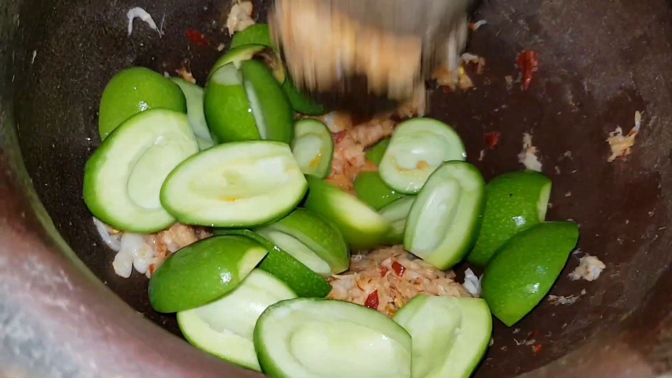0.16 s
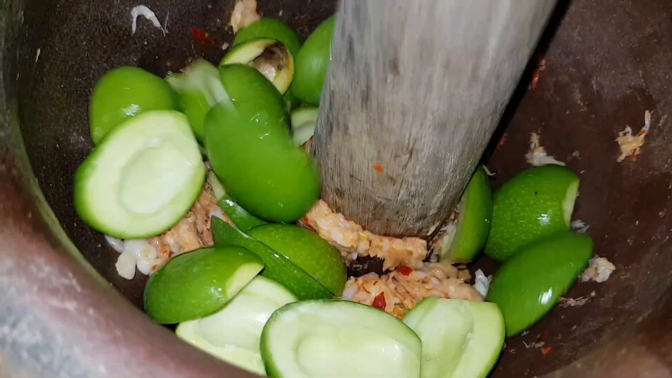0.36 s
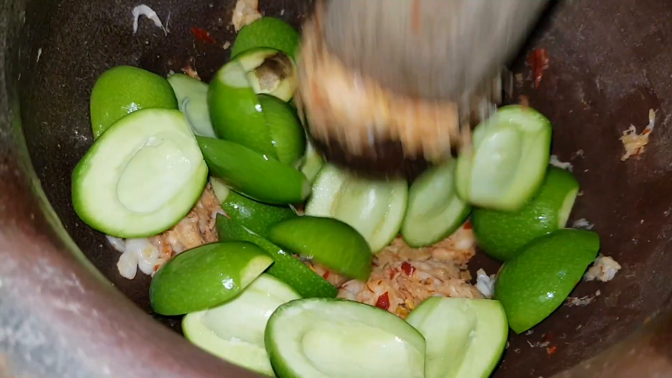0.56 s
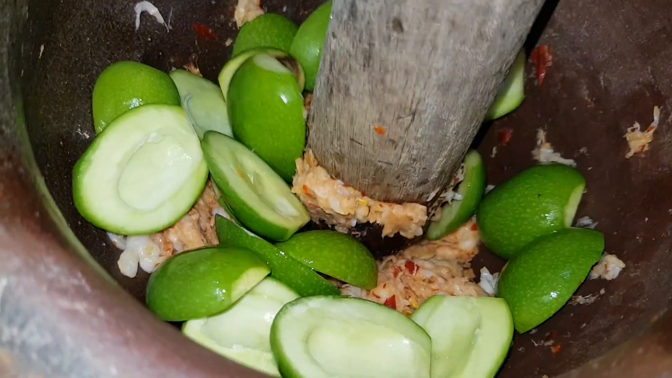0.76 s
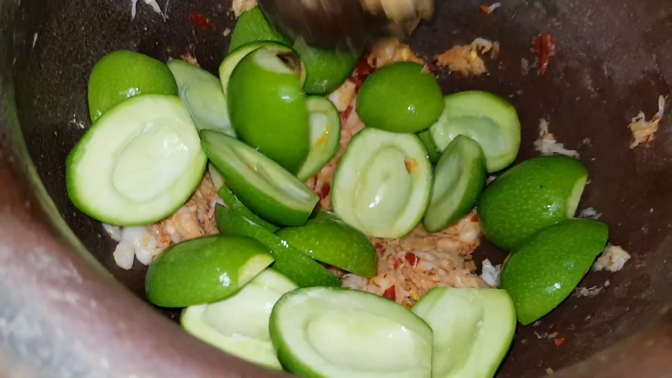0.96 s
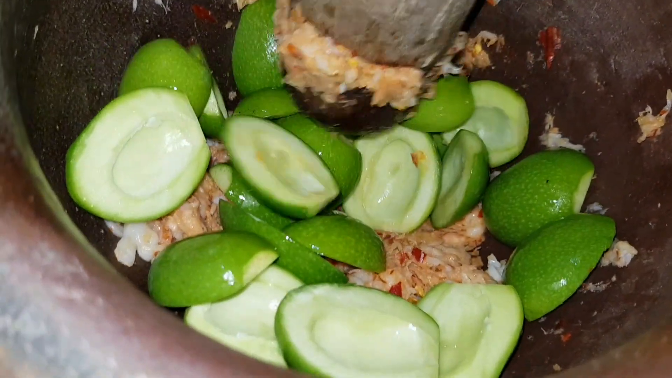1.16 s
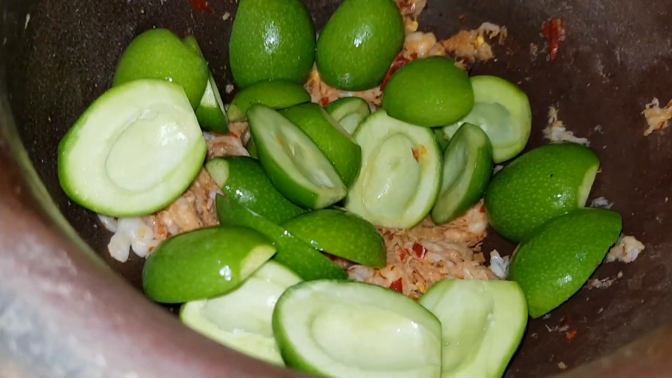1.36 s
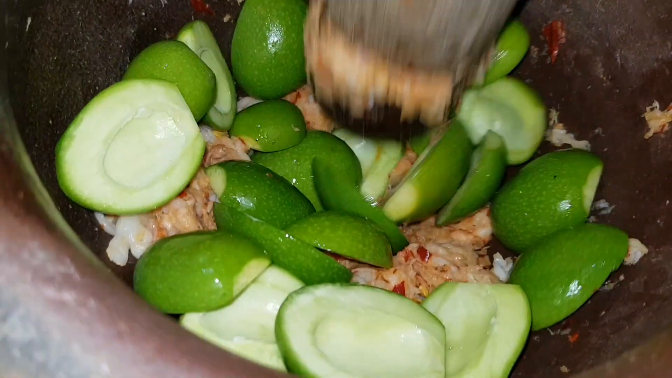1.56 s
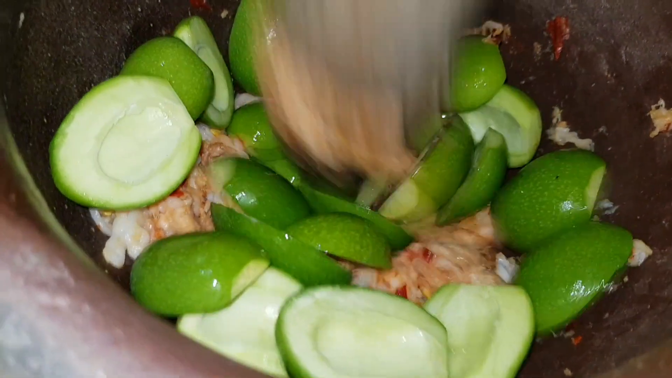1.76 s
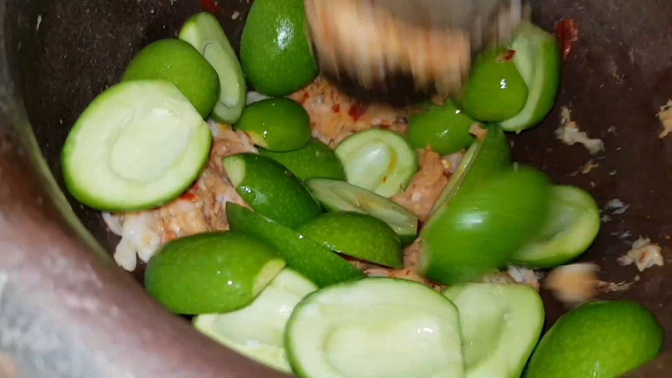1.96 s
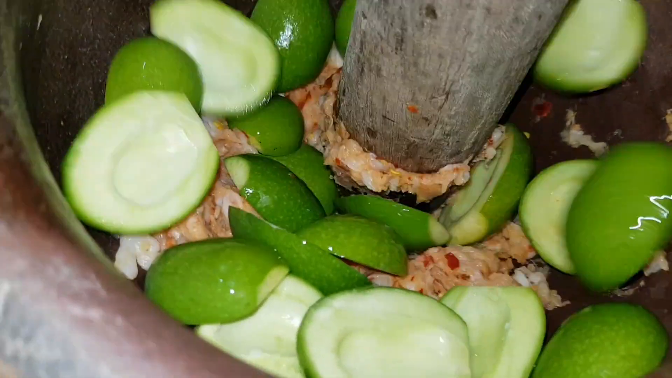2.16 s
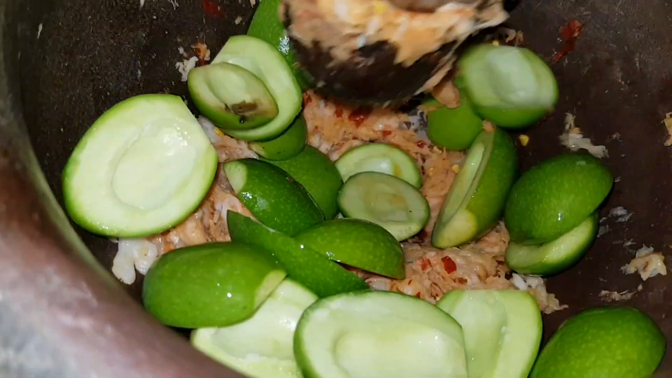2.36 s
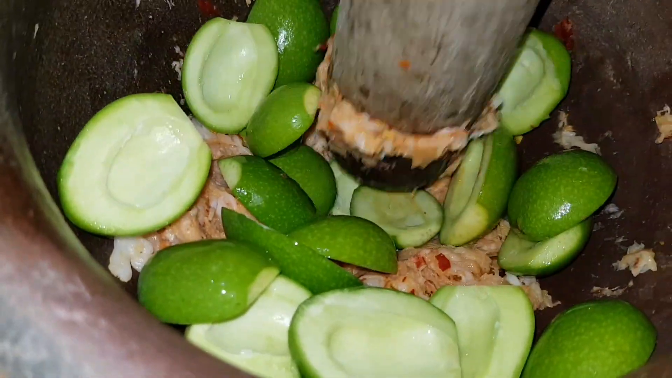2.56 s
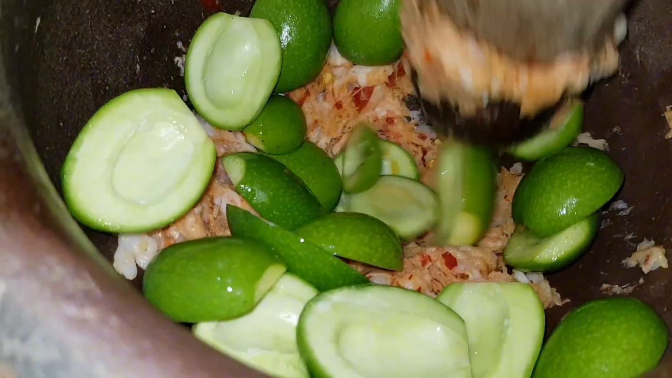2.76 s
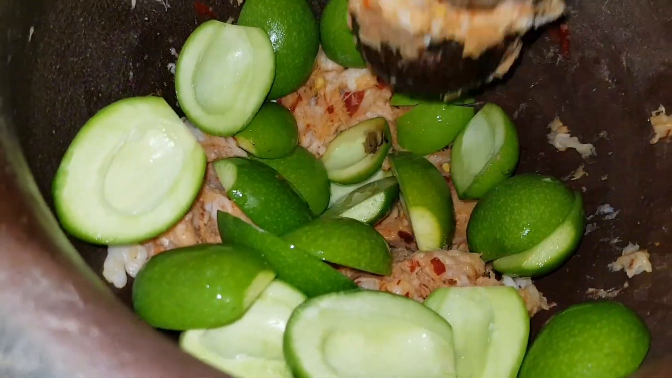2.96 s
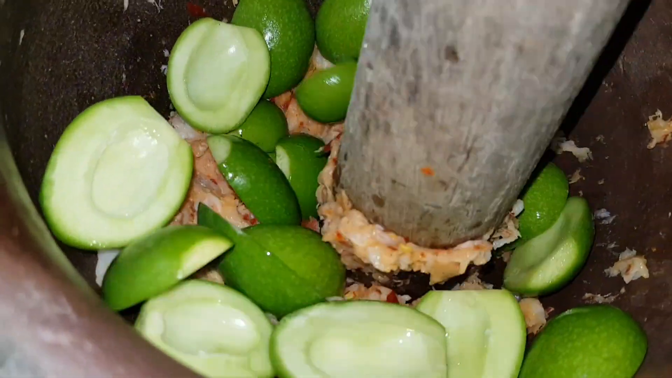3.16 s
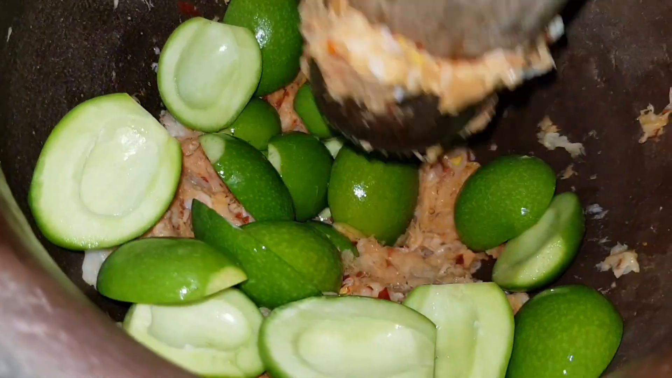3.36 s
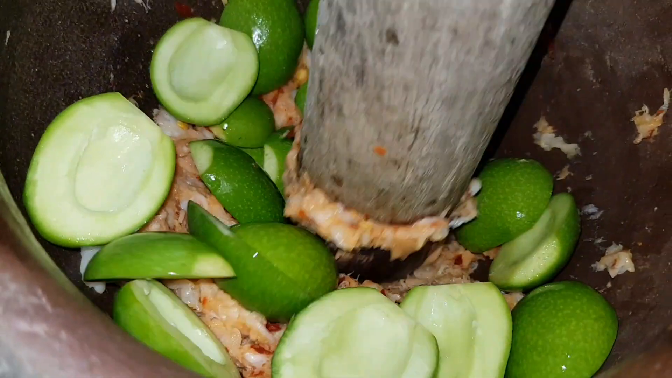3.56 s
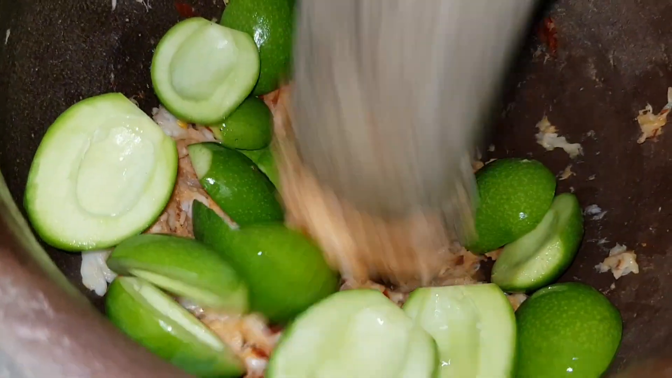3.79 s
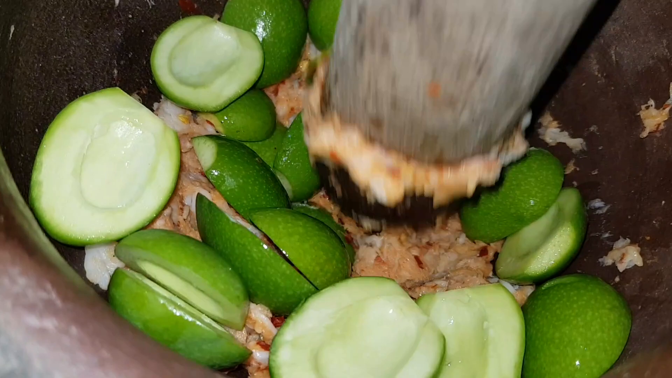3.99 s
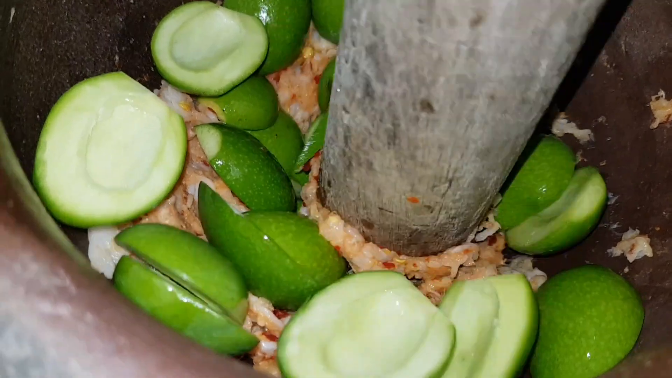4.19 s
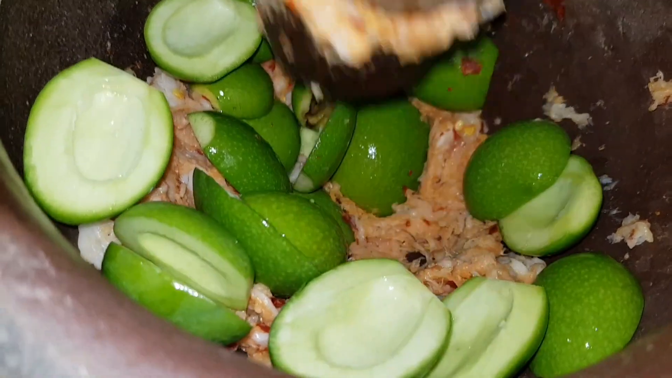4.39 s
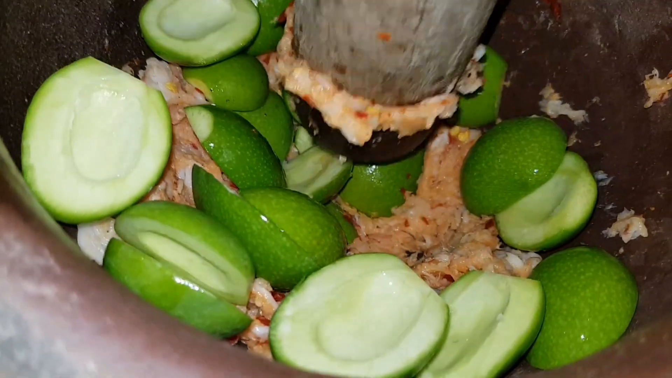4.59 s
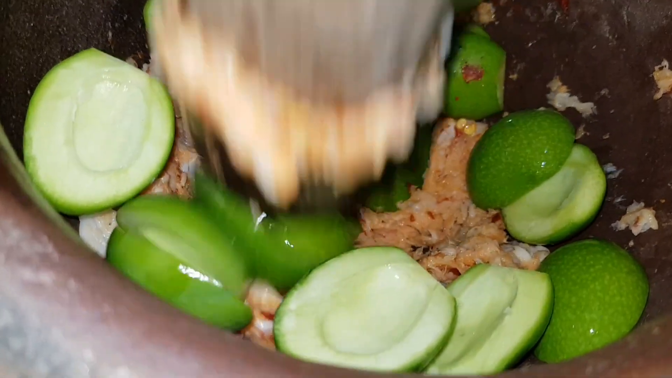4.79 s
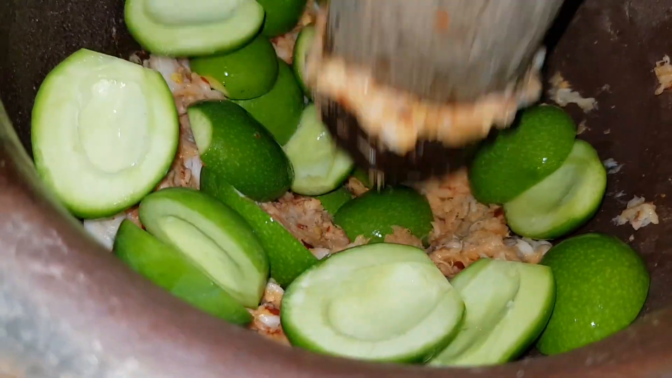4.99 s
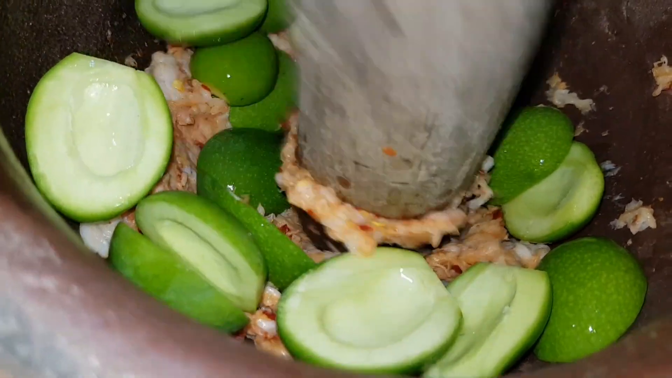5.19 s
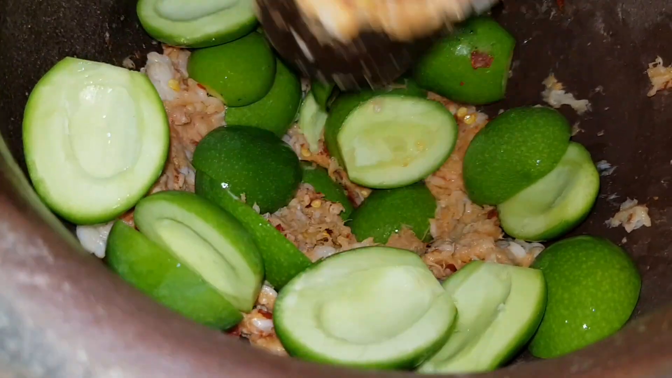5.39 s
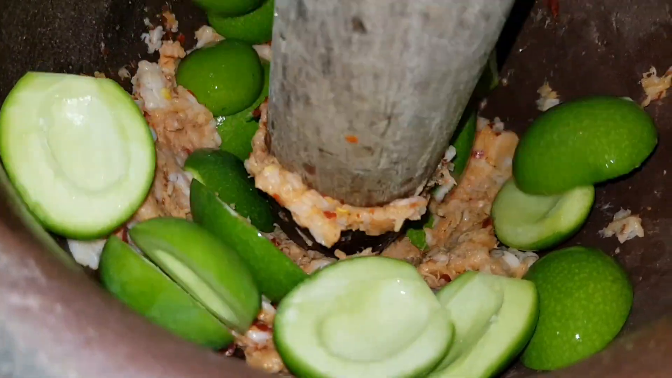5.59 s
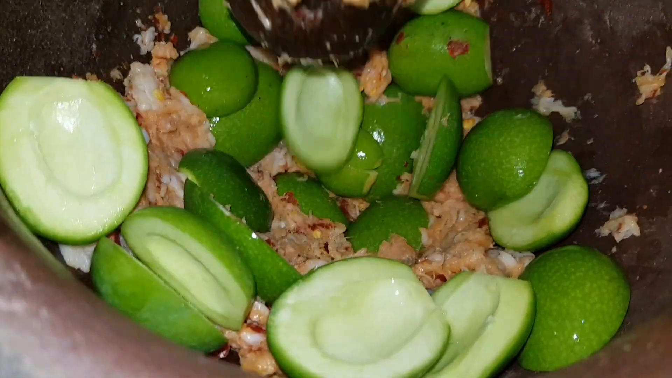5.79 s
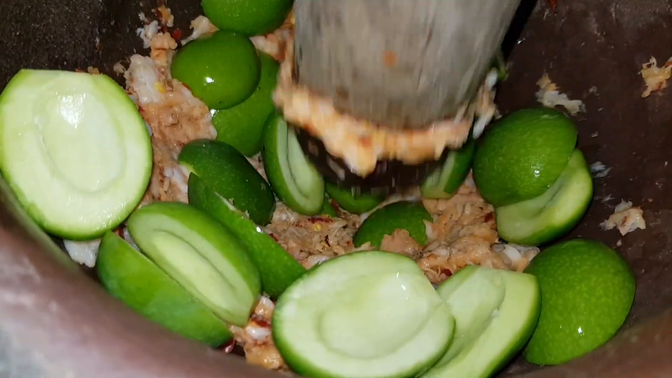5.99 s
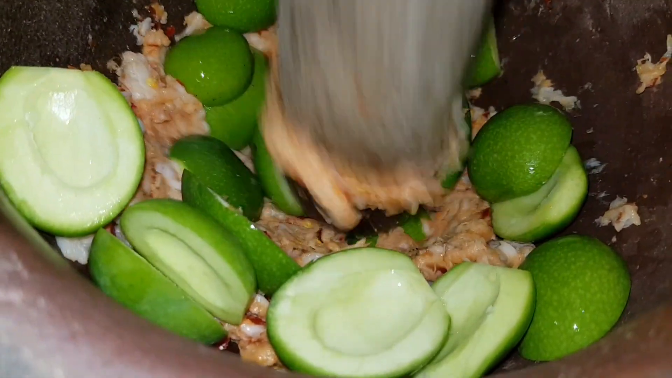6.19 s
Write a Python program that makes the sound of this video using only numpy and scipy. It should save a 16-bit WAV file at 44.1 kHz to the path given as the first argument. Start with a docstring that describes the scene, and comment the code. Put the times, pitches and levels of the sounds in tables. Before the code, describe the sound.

A quiet room, microphone close to a clay mortar. From 0.04 s to the end at about 6 s a wooden pestle strikes every 0.35 s, eighteen strokes in all. Each gives a short, damped, hollow knock, a wet crackling crunch with fine juice fizz, and a soft low thump through the floor. Strokes at 0.4 to 1.5 s are mostly muted; a crisp, crunchy one lands near 2.2 s, a hard knock at 2.5 s, and firm blows around 3.5 to 4.6 s and 5.9 s. Slices tumble softly at 2.3 to 2.8 s. Sticky squelches follow the lifts, clearer after 2.8 s. The base rocks with dull bouncing knocks from 2.25 s, frequent after 2.9 s, loudest at 5.36 s. A tiny juice hiss spits at 3.3 s. Faint raspy cricket chirps near 4.5 kHz run almost continuously over low, soft room noise.

```python
"""Quiet room: a wooden pestle pounds sliced green fruit into shrimp paste in a clay mortar, close by.
About three strokes a second: noise grains crunch and fizz as flesh tears, damped modes knock in the bowl,
low modes thump in the floor. Between strokes the mortar rocks on its base with dull, bouncing knocks.
Paste squelches as the pestle lifts, slices tumble and slide; shaped noise bursts and soft knocks.
Outside a cricket chirps in gliding, raspy tones; filtered noise and faint far tones fill the room."""
import sys
import numpy as np
from scipy import signal
from scipy.fft import rfft, irfft
from scipy.io import wavfile
from scipy.ndimage import uniform_filter1d

SR = 44100
rng = np.random.default_rng(int(sys.argv[2]) if len(sys.argv) > 2 else 0)


def wrap_up_sound(samples):
    """Save the sound to the file named by the first command line argument, as 16-bit audio."""
    columns = np.atleast_2d(samples).T
    # keep every value between -1 and 1, then stretch to whole-number steps
    tamed = np.clip(columns, -1, 1)
    steps = np.round(tamed * 32767).astype(np.int16)
    wavfile.write(sys.argv[1], SR, steps)


N = 275448

# Pestle squeezing fruit, then pulling out of the paste. Each row: start in seconds, length in seconds,
# then relative levels in dB of crunch, juice spray, floor thump, suck on lifting.
STROKES = [(0.038, 0.023, -25.5, -34, -34, -80), (0.405, 0.034, -38, -39.5, -44, -51.5),
           (0.757, .038, -32.5, -41, -36, -75), (1.107, 0.055, -42.5, -40.5, -43, -67),
           (1.481, 0.034, -32, -39.5, -33, -75), (1.83, 0.02, -24.5, -33, -26.5, -77),
           (2.161, 0.021, -20, -34.5, -22.5, -58.5), (2.493, .023, -32, -35.5, -27, -55),
           (2.821, 0.065, -40, -42, -39, -53), (3.172, 0.036, -28.5, -38, -43, -47),
           (3.528, 0.02, -31.5, -36, -26.5, -54), (3.863, 0.022, -28, -39.5, -25.5, -48),
           (4.198, 0.0394, -31.5, -39.5, -21, -42), (4.542, 0.03, -33.5, -40, -28, -77),
           (4.873, 0.057, -37, -42, -39.5, -52), (5.228, 0.054, -37, -40, -31, -48.5),
           (5.575, 0.044, -30.5, -41.5, -29, -49.5), (5.917, 0.018, -24, -35.5, -23.5, -77)]
# Ring of the mortar struck from inside, led by the air in its hollow.
# Each row: frequency in Hz, relative level in dB, t60 in seconds.
BOWL_MODES = [(445, -23.5, 0.11), (623.2, 3, 0.046), (762, 6.5, 0.013), (980, -5.5, 0.02),
              (1035, -5, 0.022), (1253, -13.5, 0.071), (1655, -7.5, 0.039), (2210, -11.5, 0.031),
              (2530, -52, 0.173), (2863, -7, 0.044), (3040, -27.5, 0.027)]


def undb(db):
    """Decibels to amplitude gain."""
    return 10 ** (np.asarray(db) / 20)


def unit(x):
    """Scale to rms 1."""
    return x / np.sqrt(np.mean(x ** 2) + 1e-18)


def clock(length_s):
    """Sample times in seconds."""
    return np.arange(int(length_s * SR)) / SR


def fade(t, t60_s):
    """Exponential decay, 60 dB in t60."""
    return np.exp(-np.log(1000) * t / t60_s)


def add(track, at_s, sound):
    """Mix a sound into a track at a time, cropped to the track."""
    i = int(round(at_s * SR))
    a, b = max(i, 0), min(i + len(sound), N)
    if b > a:
        track[a:b] += sound[a - i:b - i]


def through(x, response):
    """Convolve with an impulse response, keeping the length of x."""
    return signal.oaconvolve(x, response)[:len(x)]


def butter(order, hz, kind, x):
    """Butterworth filter."""
    return signal.sosfilt(signal.butter(order, hz, kind, fs=SR, output="sos"), x)


def colour(points, size=4096):
    """Minimum-phase response of unit energy with a given spectrum, via the folded cepstrum."""
    hz, db = np.transpose(points)
    bins_hz = np.maximum(np.fft.rfftfreq(size, 1 / SR), 1)
    level_db = np.interp(np.log(bins_hz), np.log(hz), db)
    cepstrum = irfft(np.log(undb(level_db)))
    cepstrum[1:size // 2] *= 2
    cepstrum[size // 2 + 1:] = 0
    response = irfft(np.exp(rfft(cepstrum)))
    return response / np.linalg.norm(response)


def ring(modes, detune=0, length_s=.15):
    """Sum of damped modes, each shifted at random by a fraction of its pitch (load in the bowl)."""
    t = clock(length_s)
    out = 0
    for hz, db, t60_s in modes:
        shifted_hz = hz * (1 + detune * rng.standard_normal())
        out = out + undb(db) * fade(t, t60_s) * np.cos(2 * np.pi * shifted_hz * t)
    return out


def knock(modes, contact_ms, detune):
    """A smooth push rings the modes: the longer the contact, the duller the knock. Peak 1."""
    t = clock(.008)
    contact_s = max(contact_ms, .2) / 1000
    push = np.sin(np.pi * np.minimum(t / contact_s, 1)) ** 2
    sound = through(ring(modes, detune, length_s=.08), push)
    return sound / np.abs(sound).max()


def walk(rate_hz):
    """Smoothed random steps, rms 1."""
    k = int(SR / rate_hz)
    steps = np.repeat(rng.standard_normal(N // k + 1), k)
    return unit(uniform_filter1d(uniform_filter1d(steps, k), k)[:N])


def grains(per_s, spread_db):
    """Bursting cells: random clicks of uneven size, rms 1."""
    size = undb(spread_db * np.minimum(rng.exponential(size=N), 4))
    return unit((rng.random(N) < per_s / SR) * size * rng.standard_normal(N))


def spurts(per_s=300, depth_db=3.5):
    """Flesh gives way in fits and starts: an uneven gain of rms 1."""
    return unit(undb(depth_db * np.clip(walk(per_s), -2, 2)))


def squeeze(length_s, release_t60_s, settle_db, settle_t60_s):
    """Pressure on the flesh: it builds within 2 ms, holds, lets go, and the pulp settles."""
    t = clock(.3)
    after = np.maximum(t - length_s, 0)
    rise = np.minimum(t / .002, 1)
    return rise * (fade(after, release_t60_s) + undb(settle_db) * fade(after, settle_t60_s))


def room(low_t60_s, high_t60_s, split_hz=1500, gap_s=0.0039):
    """Diffuse echoes of unit energy: noise decaying at separate bass and treble rates."""
    t = clock(0.85)
    noise = rng.standard_normal(len(t))
    low = butter(2, split_hz, "lowpass", noise)
    tail = low * fade(t, low_t60_s) + (noise - low) * fade(t, high_t60_s)
    tail = tail * (t > gap_s)
    return tail / np.linalg.norm(tail)


def contacts(settle_count=8, settle_db=-50.5):
    """All that strikes the bowl: the pestle, tumbling slices and a few that shift at random times."""
    # Pestle breaking through a slice to the bowl. Each row: start in seconds, relative thud in dB,
    # contact in ms, relative crack in dB, relative wet snap in dB.
    blows = [(.0579, -7, 1.24, -26.5, -26.5), (.3551, -23.5, 3.1, -29.5, -64), (.3918, -15, 1.47, -30, -43),
             (.4088, -11.5, 1.35, -17, -55), (.7605, -20, 0.78, -39, -58), (.7913, -28, 1.35, -46, -27.5),
             (1.1078, -24, 1.6, -68, -57), (1.4844, -16.5, 2.44, -22.5, -39),
             (1.4938, -12.5, 0.52, -27, -27.5), (1.5568, -19.5, 0.81, -49, -59),
             (1.8346, -9.5, 0.37, -20.5, -48), (2.1637, -21, 0.97, -28, -32),
             (2.1708, -11.5, 1.64, -15, -34), (2.1824, -32, 1.5, -7, -15), (2.5, 1, 0.45, -15.5, -16),
             (2.5178, -28, 1.2, -20.5, -31.5), (2.8394, -10, 0.3, -49, -28), (2.8568, -18, .46, -46, -38),
             (3.1916, -13.5, .18, -39, -43), (3.2043, -12.5, 1.15, -51, -38),
             (3.5301, -8.5, 0.39, -11, -34.5), (3.5368, -4, 0.94, -22.5, -51),
             (3.8714, -1.5, 0.28, -21, -33), (3.8758, -4.5, 0.37, -17, -24.5),
             (4.2083, -6.5, 0.67, -20, -30), (4.2236, -4.5, 1.27, -13, -21), (4.5462, -15, .18, -26, -47.5),
             (4.5648, -5.5, 2.28, -19.5, -41), (4.8728, -27, 0.19, -33, -55.5),
             (4.9128, -23, 0.8, -41, -37), (5.2305, -21.5, 0.99, -43, -36), (5.2632, -6, 0.53, -42, -30.5),
             (5.5842, -20.5, 0.55, -35, -41), (5.5947, -14.5, 1.4, -8.5, -28),
             (5.5994, -16, 0.52, -14.5, -12), (5.9049, -15, 1.06, -30, -37), (5.9288, -1.5, 0.39, -24, -30),
             (5.9353, -15, 0.48, -8, -27.5)]
    # Slices tumbling back between strokes. Each row: start in seconds, relative thud in dB.
    tumbles = [(.253, -38), (.631, -39), (.678, -35), (2.309, -25), (2.379, -34.5), (2.4181, -23.5),
               (2.449, -29.5), (2.73, -29), (2.7812, -27), (4.1242, -29)]
    contact_ms, crack_db, snap_db = 1.52, -10.5, -25.5  # slices; crack and snap against the thud
    settling = [(when * N / SR, settle_db + 6 * (size - .5)) for when, size in rng.random((settle_count, 2))]
    slices = [(at, db, contact_ms, db + crack_db, db + snap_db) for at, db in tumbles + settling]
    return blows + slices


def squelches(smack_count=6):
    """Rows for brushing, sucking and smacking: start s, length s, relative crunch dB and spray dB."""
    touch_lead_s, touch_s, touch_crunch_db, touch_spray_db = 0.0042, 0.0025, -16.5, -16  # against the stroke
    lift_delay_s, lift_s, lift_crunch_db = 0.0968, 0.037, -3  # after squeeze start; crunch against suck
    # torn pulp keeps smacking after each squeeze, on average ever more softly
    smack_span_s, smack_s, fall_db_per_s, scatter_db = .26, 0.0053, 48, 2.5
    smack_crunch_db, smack_spray_db = -15.5, -11.5  # against the stroke
    rows = []
    for at, length_s, crunch_db, spray_db, _, suck_db in STROKES:
        rows.append((at - touch_lead_s, touch_s, crunch_db + touch_crunch_db, spray_db + touch_spray_db))
        rows.append((at + lift_delay_s, lift_s, suck_db + lift_crunch_db, suck_db))
        for k in range(smack_count):
            wait_s = smack_span_s * ((k + rng.random()) / smack_count) ** 1.3
            db = scatter_db * rng.standard_normal() - fall_db_per_s * wait_s
            start_s = at + length_s + wait_s
            rows.append((start_s, smack_s, crunch_db + smack_crunch_db + db, spray_db + smack_spray_db + db))
    return rows


def flesh(hits):
    """Tearing fruit crackles in the hollow of the bowl while juice fizzes above it."""
    # Crunch spectrum. Each row: frequency in Hz, relative level in dB.
    crunch_colour = [(100, -36), (300, 4), (620, 4.5), (850, -1), (1400, 0), (2400, -0.5), (3300, -4.5),
                     (4500, -10), (7000, -22), (16000, -39.5)]
    # Juice spray spectrum. Each row: frequency in Hz, relative level in dB.
    spray_colour = [(500, -9), (2500, 3.5), (4500, -0.5), (6500, 0), (8500, -4.5), (12000, 6.5),
                    (14000, 1.5), (16000, -2.5)]
    crunch, spray, crack, snap = np.zeros((4, N))
    for at, length_s, crunch_db, spray_db, _, _ in STROKES:
        pressure = squeeze(length_s, release_t60_s=0.032, settle_db=-22.5, settle_t60_s=0.4)
        add(crunch, at, undb(crunch_db) * pressure)
        add(spray, at, undb(spray_db) * pressure)
    for at, length_s, crunch_db, spray_db in squelches():
        pressure = squeeze(length_s, release_t60_s=.02, settle_db=-24, settle_t60_s=.1)
        add(crunch, at, undb(crunch_db) * pressure)
        add(spray, at, undb(spray_db) * pressure)
    # the skin splits at each hit
    t = clock(0.048)
    for at, _, _, crack_db, snap_db in hits:
        add(crack, at + 0.00053, undb(crack_db) * fade(t, .016))
        add(snap, at + 0.00032, undb(snap_db) * fade(t, 0.019))
    # the crack is kept to the upper range, above about 850 Hz
    split = butter(2, 850, "highpass", crack * grains(20000, 0.93))
    tearing = spurts()
    low = crunch * tearing * grains(1900, 2.2) + undb(4.5) * split
    high = spray * tearing * grains(7000, 2.14) + undb(2.0) * snap * grains(18000, 1.23)
    low = through(low, colour(crunch_colour))
    bowl = ring(BOWL_MODES)
    hollow = through(low, bowl / np.linalg.norm(bowl))
    return undb(-5.5) * low + undb(-15.5) * hollow + through(high, colour(spray_colour))


def thuds(hits, low_hz=130):
    """Pestle and slices knock on the bowl, cushioned by the paste; the bowl radiates little bass."""
    out = np.zeros(N)
    for at, db, contact_ms, _, _ in hits:
        add(out, at, undb(db) * knock(BOWL_MODES, contact_ms, detune=0.023))
    return butter(1, low_hz, "highpass", out)


def thumps(delay_share=0.68, push_s=0.0058, gain_db=5):
    """The weight of each stroke reaches the floor as the fruit gives way; jolts fall between strokes."""
    # Floor modes. Each row: frequency in Hz, relative level in dB, t60 in seconds.
    floor_modes = [(54.5, -5.5, 0.27), (82, 2, 0.11), (111, 1.5, 0.1)]
    # Jolts that reach the floor between strokes. Each row: start in seconds, relative level in dB.
    jolts = [(.283, -40.5), (.356, -31), (.913, -37.5)]
    landings = [(at + delay_share * length_s, db) for at, length_s, _, _, db, _ in STROKES]
    out = np.zeros(N)
    for at, db in jolts + landings:
        push = np.hanning(int(push_s * SR)) * 2 / (push_s * SR)  # about unit area
        add(out, at, undb(db) * push)
    return undb(gain_db) * through(out, ring(floor_modes, length_s=0.39) / 2)


def pitched_rings():
    """Short pitched rings, most of them on a blow, a few faint ones between blows: decaying sines."""
    # Each row: start in seconds, frequency in Hz, level in dB, t60 in seconds.
    rings = [(.059, 670, -23, 0.063), (0.173, 965, -52, 0.14), (.762, 430, -29.5, 0.1),
             (1.486, 393, -15, 0.029), (2.262, 1387, -51, 0.48), (2.8397, 1400, -19, 0.053),
             (3.174, 2290, -23.5, 0.032), (3.5372, 802, -11.5, 0.024), (3.872, 1040, -14.5, .04),
             (3.875, 3200, -30, 0.032), (4.226, 593, -15.5, .05), (4.871, 1250, -22, 0.015),
             (5.262, 1630, -13.5, 0.014), (5.595, 2080, -24, 0.0084), (5.9342, 1450, -7, 0.014)]
    out, t = np.zeros(N), clock(.2)
    for at, hz, db, t60_s in rings:
        add(out, at, undb(db) * fade(t, t60_s) * np.sin(2 * np.pi * hz * t))
    return out


def rocking(soft_hz=1200, softer_ms=0.44, count=3, rebound_s=.0135):
    """The base drops back on its board and bounces, each contact weaker and softer."""
    # Mortar rocking. Each row: start in seconds, relative peak in dB, first contact in ms,
    # each rebound against the last in dB.
    rocks = [(0.9141, -28, 4.2, -14), (2.2473, -11.5, 3.6, -11), (2.9068, -9, 2.2, -2),
             (2.946, -10, 2.3, -9), (3.272, -13, 2.3, -4.5), (3.3122, -19, 2.43, -6.5),
             (3.3853, -25.5, 3.23, -30), (3.9588, -15, 2.48, -4), (4.0034, -14, 2.46, -23),
             (4.308, -23, 3.5, -1), (4.356, -15.5, 2.52, -11), (4.577, -9.5, 2.37, -26),
             (4.9989, -12, 1.94, -5), (5.074, -24, 2.55, -21), (5.081, -20, 2.7, -6),
             (5.3582, 2.5, 2.13, -34), (5.3958, -9.5, 2.63, -24), (5.4128, -8.5, 2.1, -14),
             (5.6866, -15.5, 2.5, -7.5), (6.002, -12.5, 2.3, -3), (6.0658, -20.5, 2.83, -6)]
    # Base and board. Each row: frequency in Hz, relative level in dB, t60 in seconds.
    base_modes = [(118, -25.5, 0.12), (262.4, -19.5, 0.08), (369, -16.5, 0.059), (426, -14, 0.074),
                  (486, -7, 0.03), (604.5, 7, 0.037)]
    out = np.zeros(N)
    for at, db, contact_ms, rebound_db in rocks:
        for k in range(count):
            delay_s = k * rebound_s * (1 + 0.077 * rng.standard_normal())
            bounce = knock(base_modes, contact_ms + k * softer_ms, detune=0.043)
            add(out, at + delay_s, undb(db + k * rebound_db) * bounce)
    return butter(3, soft_hz, "lowpass", out)


def squirts(width_hz=1800):
    """Juice jetting through a narrow gap hisses around one pitch: band-passed noise."""
    # Each row: start in seconds, length in seconds, centre in Hz, level in dB.
    jets = [(2.926, 0.0052, 8700, -42.5), (3.283, 0.0058, 8100, -34), (3.294, 0.002, 8050, -21.5)]
    out = np.zeros(N)
    for at, length_s, hz, db in jets:
        pressure = squeeze(length_s, release_t60_s=0.012, settle_db=-19.5, settle_t60_s=0.11)
        band_hz = [hz - width_hz / 2, hz + width_hz / 2]
        hiss = butter(1, band_hz, "bandpass", rng.standard_normal(len(pressure)))
        add(out, at, undb(db) * pressure * unit(hiss))
    return out


def slides(low_hz=1300, high_hz=3000):
    """Wet skin sliding down the clay wall: a soft noise swish that swells and fades."""
    # Each row: start in seconds, length in seconds, level in dB.
    swishes = [(0.864, 0.094, -59), (1.344, 0.16, -53.5)]
    out = np.zeros(N)
    for at, length_s, db in swishes:
        swell = np.hanning(int(length_s * SR))
        hiss = butter(2, [low_hz, high_hz], "bandpass", rng.standard_normal(len(swell)))
        add(out, at, undb(db) * swell * unit(hiss))
    return out


def cricket(syllable_s=.04, length_s=0.0336, start_hz=4900, end_hz=4380, rasp_hz=330, rasp=0.83,
            gain_db=2.5, count=3, period_s=.2018, octave_db=-22):
    """Five chirps a second, three wing strokes each; every stroke slows, its tone sags and turns raspy."""
    # Runs of evenly spaced chirps. Each row: start in seconds, end in seconds, relative level in dB.
    runs = [(-.06, .05, -47), (.316, 4.85, -49.5), (4.942, 6.24, -47.5)]
    out, t = np.zeros(N), clock(length_s)
    stroke = t / length_s
    swell = np.sin(np.pi * stroke)
    for start, end, db in runs:
        for at in np.arange(start, end, period_s):
            for k in range(count):
                wobble = unit(uniform_filter1d(rng.standard_normal(len(t)), size=90))
                hz = start_hz + (end_hz - start_hz) * stroke ** 1.67 + 60 * wobble
                teeth = 1 + rasp * stroke * np.sin(2 * np.pi * (rasp_hz * t + rng.random()))
                phase = 2 * np.pi * np.cumsum(hz) / SR
                tone = np.sin(phase) + undb(octave_db) * np.sin(2 * phase)
                level = undb(db + gain_db + 0.82 * rng.standard_normal())
                add(out, at + k * syllable_s, level * swell * teeth * tone)
    return out + undb(-3.5) * through(out, room(0.3, 0.3))


def far_tones(waver=.012):
    """Faint, slightly wavering sines from far outside, each swelling and fading."""
    # Each row: start in seconds, length in seconds, mean frequency in Hz, peak level in dB.
    swells = [(3.441, 0.089, 940, -57), (4.952, 0.22, 1090, -60), (6.15, 0.18, 1040, -55.5)]
    out = np.zeros(N)
    for at, length_s, hz, db in swells:
        swell = np.hanning(int(length_s * SR))
        pitch_hz = hz * (1 + waver * walk(150)[:len(swell)])
        add(out, at, undb(db) * swell * np.sin(2 * np.pi * np.cumsum(pitch_hz) / SR))
    return out


def room_tone(hiss_db=-51, rumble_db=-59):
    """Steady coloured noise, a slowly wandering rumble and narrow noise bands from far outside."""
    # Room spectrum. Each row: frequency in Hz, relative level in dB.
    air_colour = [(20, -42), (50, 5.5), (100, 0), (220, -9.5), (340, -19), (520, -25), (750, -25.5),
                  (1500, -30), (2800, -22), (4200, -23.5), (5700, -24), (8500, -30.5), (12500, -25.5),
                  (16000, -39)]
    # Faint wandering tones far outside. Each row: centre in Hz, width in Hz, mean level in dB.
    drones = [(476, 69, -65), (950, 240, -72.5)]
    out = unit(through(rng.standard_normal(N), colour(air_colour))) * undb(hiss_db)
    rumble = butter(2, [45, 200], "bandpass", rng.standard_normal(N))
    out += unit(rumble) * undb(rumble_db + 0.68 * walk(4.28))
    for hz, width_hz, db in drones:
        band_hz = [hz - width_hz / 2, hz + width_hz / 2]
        drone = butter(2, band_hz, "bandpass", rng.standard_normal(N))
        out += unit(drone) * undb(db + 0.59 * walk(5.6))
    return out


def scene():
    """The mortar close by, its faint room echo, the cricket, far tones and the still air."""
    hits = contacts()
    mortar = thuds(hits) + rocking() + thumps() + flesh(hits) + squirts() + pitched_rings() + slides()
    echo = undb(-20.0) * through(mortar, room(0.28, 0.2))
    return (mortar + echo + cricket() + far_tones() + room_tone())[None]


def record(dry, low_hz=22, top_hz=16000, clip=.95):
    """The microphone sheds the deepest bass, peaks beyond the limit clip, and the top is cut."""
    heard = butter(2, low_hz, "highpass", dry)
    top_cut = signal.ellip(8, .2, 70, top_hz, fs=SR, output="sos")
    return signal.sosfilt(top_cut, np.clip(heard, -clip, clip))


dry = scene()
out = record(dry)
wrap_up_sound(out)
```